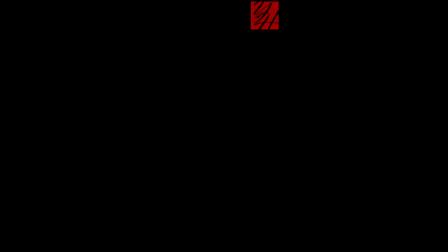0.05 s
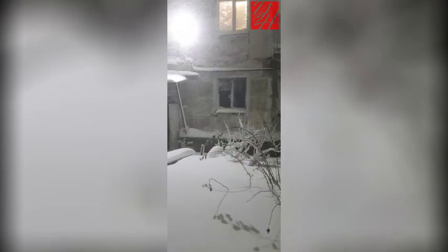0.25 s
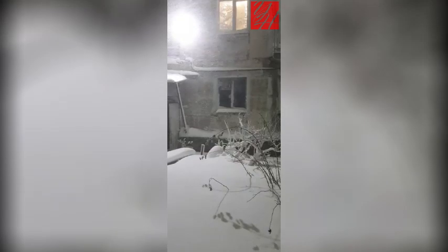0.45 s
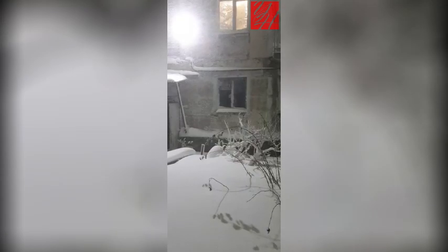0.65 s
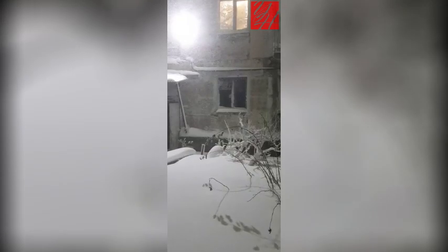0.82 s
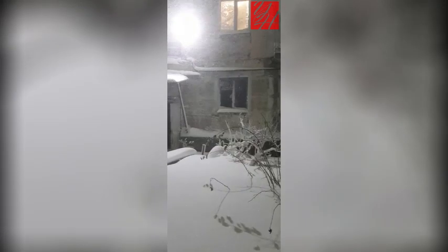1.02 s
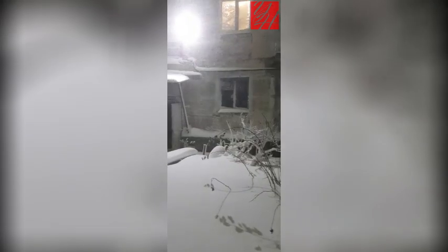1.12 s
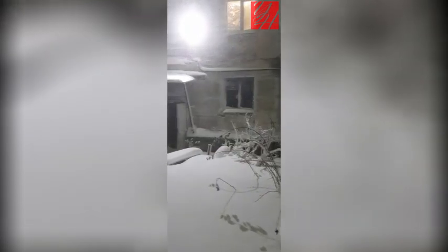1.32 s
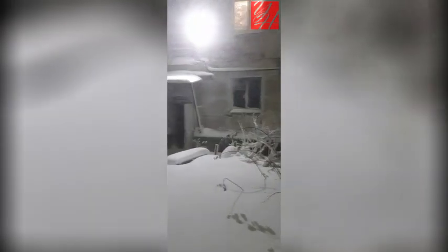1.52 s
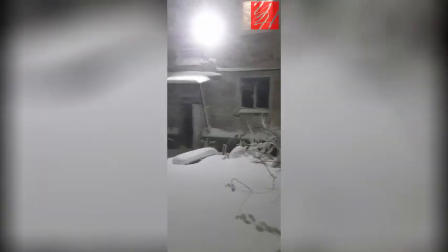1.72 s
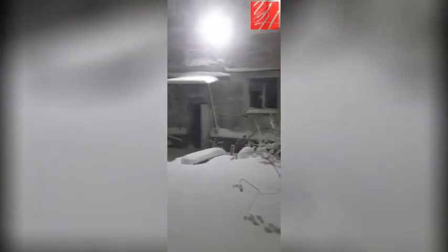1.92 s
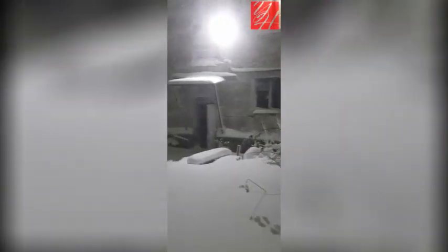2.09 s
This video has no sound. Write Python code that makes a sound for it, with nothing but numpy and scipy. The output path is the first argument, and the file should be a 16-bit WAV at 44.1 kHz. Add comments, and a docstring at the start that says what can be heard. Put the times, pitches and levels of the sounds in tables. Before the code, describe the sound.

Uneven wind gusts rumble and thud against the microphone over a faint outdoor hiss.

```python
"""Wind gusts buffet the two microphone ports of a phone in a snowy yard at night.
Eddies rumble at each port on their own and brighten as the air speeds up; large ones thud, and the
fastest air cracks. Close up, snow grains tick on the case and there are a few soft scuffs.
Far behind lies the hum of the surroundings, with a fine hiss across the whole yard."""
import sys
import numpy as np
from scipy import signal
from scipy.fft import rfft, irfft
from scipy.io import wavfile
from scipy.ndimage import uniform_filter1d

SR = 44100
rng = np.random.default_rng(int(sys.argv[2]) if len(sys.argv) > 2 else 0)


def to_wav(sig):
    """Store sig (one row per channel, or 1-D mono) as 16-bit WAV at the path in sys.argv[1].

    Samples outside -1..1 are clipped; the rate is SR.
    """
    pcm = np.clip(np.atleast_2d(sig), -1, 1) * 32767
    pcm = np.round(pcm).astype(np.int16)
    wavfile.write(sys.argv[1], SR, pcm.T)  # frames by channels


N = 94815
TIME_S, FREQS_HZ = np.arange(N) / SR, np.fft.rfftfreq(N, 1 / SR)


def undb(db):
    """Decibels to gain."""
    return 10 ** (np.asarray(db) / 20)


def unit(x):
    """Scale to rms 1."""
    return x / np.sqrt(np.mean(x ** 2))


def curve(rows):
    """Join (time [s], value) points by straight lines."""
    return np.interp(TIME_S, *np.array(rows).T)


def spectrum(outline, hz):
    """Level in dB of a (frequency [Hz], level [dB]) outline at the given frequencies."""
    outline_hz, db = np.array(outline).T
    return np.interp(np.log(np.maximum(hz, 1)), np.log(outline_hz), db)


def colour(x, outline, peaks=()):
    """Filter by an outline and optional resonances."""
    peaks_db = sum(db / (1 + (2 * (FREQS_HZ - hz) / width) ** 2) for hz, width, db in peaks)
    return irfft(rfft(x) * undb(spectrum(outline, FREQS_HZ) + peaks_db), N)


def smooth(x, samples):
    """Moving average, applied twice."""
    return uniform_filter1d(uniform_filter1d(x, samples), samples)


def wander(rate_hz):
    """Smooth random motion with rms 1."""
    return unit(smooth(rng.standard_normal(N), int(SR / rate_hz)))


def pan(db):
    """Left and right gains for a level difference, positive to the left."""
    return undb(np.array([[db], [-db]]) / 2)


def fade(at, decay_s):
    """Sudden start, exponential decay."""
    age = TIME_S - at
    return (age >= 0) * np.exp(-abs(age) / decay_s)


# Wind right on the left and right microphone ports (time [s], level [dB])
LEFT_PORT_WIND = [(.2, -20), (.274, -18), (.285, -23.5), (.345, -22.5), (.555, -33.5), (.58, -54),
                  (.675, -35.5), (.725, -27), (.77, -42), (.803, -21), (.89, -29), (.972, -23.5),
                  (1.0, -37.5), (1.2, -31), (1.335, -31), (1.36, -23), (1.445, -34.5), (1.62, -24.5),
                  (1.695, -21.5), (1.765, -24), (1.787, -37), (1.85, -29), (1.91, -60), (2.15, -61)]
RIGHT_PORT_WIND = [(.2, -26.5), (.25, -15), (.295, -29.5), (.345, -17.5), (.415, -30), (.47, -26),
                   (.755, -33.5), (.8, -18.5), (.85, -23.5), (.89, -30), (.973, -22.5), (.995, -32),
                   (1.23, -39.5), (1.31, -25.5), (1.335, -33.5), (1.36, -24), (1.412, -25), (1.44, -56),
                   (1.49, -65), (1.56, -34), (1.615, -32.5), (1.645, -19), (1.752, -22), (1.78, -34.5),
                   (1.853, -29), (1.9, -41), (2.03, -48.5), (2.055, -34), (2.15, -44.5)]
# Eddy size at the ports, heard as a shift of the rumble (time [s], upward shift [octaves])
RUMBLE_SHIFT = [(.2, 0.47), (.35, 0.64), (.44, -.2), (.725, 0.22), (.82, 0.067), (.94, 0.32), (.965, 0.64),
                (1.2, 0.18), (1.37, 0.73), (1.45, -0.23), (1.56, 0.52), (1.68, 0.13)]
# Rumble at a port before any shift (frequency [Hz], level [dB])
RUMBLE_SPECTRUM = [(20, 0), (120, 0), (200, -6.5), (380, -9), (600, -22.5), (900, -44.5), (1500, -50.5),
                   (6000, -105)]


def wind(strength, reference_db=-19.5, trim_db=-0.85, flutter_db=2.5, buffet_db=3.5, low_cut_hz=50.4):
    """Eddies at one port: faster air is louder and brighter, and comes in quick uneven shoves."""
    level_db, push_db = curve(strength), pushes()
    shift_octaves = curve(RUMBLE_SHIFT) + 0.087 * (level_db - reference_db) + 0.0867 * push_db
    octave = np.log2(np.maximum(FREQS_HZ, 1))
    eddies = rfft(rng.standard_normal(N))
    rumble = power = 0
    for hz in 25 * 2 ** (np.arange(16) / 2):  # half-octave bands
        band = irfft(eddies * np.maximum(1 - 2 * abs(octave - np.log2(hz)), 0), N)
        port_gain = 1 / np.sqrt(1 + (low_cut_hz / hz) ** 8)  # the ports lose the deepest bass
        band_db = spectrum(RUMBLE_SPECTRUM, hz / 2 ** shift_octaves) + flutter_db * wander(rate_hz=64)
        gain = port_gain * undb(band_db) * np.sqrt(hz)
        rumble += gain * unit(band)
        power += gain ** 2
    buffeted = rumble / np.sqrt(power) * undb(buffet_db * wander(rate_hz=99) + push_db)
    slow_rms = np.sqrt(smooth(buffeted ** 2, samples=1800))  # dividing by it leaves only quick shoves
    return buffeted / slow_rms * undb(level_db + trim_db)


# Hum from far beyond the yard (frequency [Hz], level [dB])
HUM_SPECTRUM = [(40, -20), (160, -15), (280, 1), (540, -1), (1000, -14), (4500, -32), (16000, -59)]
# Resonances in that hum (frequency [Hz], width [Hz], gain [dB])
HUM_RESONANCES = [(370, 72, 4.7), (674, 16, 2.7), (1512, 42, 8.3), (2020, 29, 5.4)]
# The hum as it reaches the microphone (time [s], level [dB])
HUM_SWELL = [(.2, -51), (1.2, -50), (1.8, -44), (2.15, -47.5)]


def distant_hum(side_db=-4):
    """The surroundings drone from a distance, much the same at both ports."""
    mid, side = colour(rng.standard_normal((2, N)), HUM_SPECTRUM, HUM_RESONANCES)
    drone = mid + undb(side_db) * np.array([side, -side])
    return unit(drone) * undb(curve(HUM_SWELL))


# Background hiss in the yard (frequency [Hz], level [dB])
HISS_SPECTRUM = [(500, 3.5), (2000, -7), (3200, -8), (4300, 3.5), (6000, -1.5), (8000, 3), (12000, 0.5)]
# The hiss at the microphone (time [s], level [dB])
HISS_SWELL = [(.2, -55), (.78, -66), (.95, -58.5), (1.2, -66.5), (1.45, -68), (1.73, -57), (1.9, -67),
              (2.15, -67)]


def hiss():
    """Fine wide hiss that swells and sinks behind the wind."""
    return unit(colour(rng.standard_normal((2, N)), HISS_SPECTRUM)) * undb(curve(HISS_SWELL))


# Grains landing on the case, next to the ports (time [s], relative level [dB], ring gain [dB])
SNOW_GRAINS = [(0.3889, -39.5, -8), (0.477, -49, -0.5), (.541, -49.5, 0), (0.5688, -42, -8),
               (0.717, -57, 2.5), (.872, -46.5, -5), (1.181, -43.5, -10), (1.502, -49, -9),
               (1.549, -44, -12), (1.739, -38, -7.5), (1.7797, -33, -25)]
# A grain's click, heard close up (frequency [Hz], gain [dB])
CLICK_SPECTRUM = [(1000, -20), (4900, -5), (5800, 5.5), (8000, -2.5), (13000, 3.5)]


def snow(click_s=0.0013, ring_s=0.0015, ring_hz=4310, trim_db=-4.5, faint_per_s=98):
    """Grains tick on the case, a few clear ones among many faint ones; the clear ones ring it briefly."""
    envelope = rings = 0
    for at, db, ring_db in SNOW_GRAINS:
        strike = pan(2.5) * undb(db + trim_db)
        hz = ring_hz * np.exp(0.082 * rng.standard_normal())
        envelope += strike * fade(at, click_s)
        rings += strike * undb(ring_db) * fade(at, ring_s) * np.sin(2 * np.pi * hz * (TIME_S - at))
    landings = rng.random(N) < faint_per_s / SR
    faint_strikes = landings * undb(-59 + 1.5 * rng.standard_normal((2, N)))
    envelope += signal.lfilter([1], [1, -np.exp(-1 / (click_s * SR))], faint_strikes)  # each dies away
    return colour(envelope * rng.standard_normal((2, N)), CLICK_SPECTRUM) + rings


# Large eddies hitting the ports (time [s], level [dB], frequency [Hz], left minus right [dB])
LARGE_EDDIES = [(.238, -25, 204, 11), (.273, -17.5, 140, 14), (0.531, -25.5, 121, -9), (0.668, -28, 86, -9),
                (.717, -24.5, 288, 0), (.81, -15.5, 184, 4), (.827, -18.5, 175, 3.5), (.973, -17.5, 99, 2),
                (1.312, -27.5, 140, -14), (1.367, -18, 236, -8.5), (1.404, -18.5, 130, -10),
                (1.64, -18, 97, 6), (1.692, -23, 186, -1)]


def thuds(half_length_cycles=0.66):
    """A large eddy gives the ports a swing or two of pressure, not quite in step."""
    pressure = 0
    for at, db, hz, side_db in LARGE_EDDIES:
        phase = rng.uniform(0, 2 * np.pi) + .5 * rng.standard_normal((2, 1))
        cycles = hz * (TIME_S - at)
        envelope = undb(db) * np.exp(-(cycles / half_length_cycles) ** 2)
        pressure += pan(side_db) * envelope * np.sin(2 * np.pi * cycles + phase)
    return pressure


# Flaps of air right on the ports (time [s], level [dB])
AIR_FLAPS = [(0.2498, -28), (0.2708, -18.5)]
# The crack of one flap (frequency [Hz], level [dB])
CRACK_SPECTRUM = [(200, -3), (650, 7), (2000, -15.5), (5000, -55)]


def cracks(decay_s=0.0014):
    """The fastest air flaps against the ports in very short bright bursts."""
    noise = rng.standard_normal((2, N))
    bursts = sum(undb(db) * fade(at, decay_s) for at, db in AIR_FLAPS)
    return colour(bursts * noise, CRACK_SPECTRUM) / np.std(colour(noise, CRACK_SPECTRUM))


# Sudden pushes of air on both ports (time [s], relative gain [dB])
AIR_PUSHES = [(.25, 4), (.295, 8), (.394, 4), (.713, 7), (0.78, 10), (0.847, 4), (.958, 8), (1.118, 7),
              (1.346, 8), (1.395, 6.5), (1.684, 5.5), (1.729, 7)]


def pushes(decay_s=0.0048):
    """Each push of air makes the wind louder and brighter for a moment; returns a curve in dB."""
    return uniform_filter1d(sum(db * fade(at, decay_s) for at, db in AIR_PUSHES), size=60)


# Soft scuffs to the right of the microphone (time [s], length [s], level [dB])
SCUFF_STROKES = [(0.4, 0.0092, -46.5), (1.214, 0.019, -47.5), (1.276, 0.017, -46.5), (1.412, 0.029, -44.5),
                 (1.448, 0.033, -46.5), (1.467, 0.0082, -47)]
# Their dull rub (frequency [Hz], level [dB])
SCUFF_SPECTRUM = [(150, -23), (400, 11.5), (1200, -2), (1600, -5.5), (2200, -24), (8000, -58)]


def scuffs(grain_db=5, grain_hz=300, side_db=-14):
    """Short grainy rubs that swell and fade."""
    swell = sum(undb(db) * np.exp(-(2 * (TIME_S - at) / length) ** 2) for at, length, db in SCUFF_STROKES)
    noise = colour(rng.standard_normal((2, N)), SCUFF_SPECTRUM)
    rub = unit(noise * undb(grain_db * wander(grain_hz)))
    return pan(side_db) * swell * rub


def scene():
    """Wind right on the microphone, the quiet yard behind it."""
    gusts = np.array([wind(LEFT_PORT_WIND), wind(RIGHT_PORT_WIND)])
    return gusts + thuds() + cracks() + distant_hum() + hiss() + snow() + scuffs()


# Response of the phone's microphone (frequency [Hz], gain [dB])
MIC_RESPONSE = [(7800, -3), (8600, -16.5), (9600, -10.5), (11500, -1)]


def record(dry, start_s=.201, top_hz=15900):
    """The microphone dips near 9 kHz; the sound starts abruptly and the top is cut."""
    cut_in = curve([(start_s, 0), (start_s + 0.00071, 1)])
    low_pass = signal.ellip(8, .2, 70, top_hz, fs=SR, output="sos")
    return signal.sosfilt(low_pass, colour(dry, MIC_RESPONSE) * cut_in)


dry = scene()
out = record(dry)
to_wav(out)
```